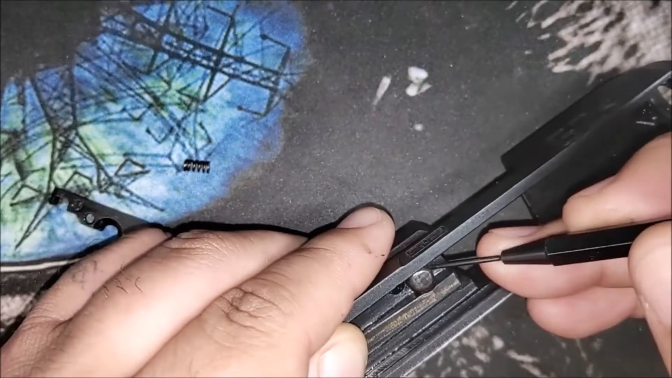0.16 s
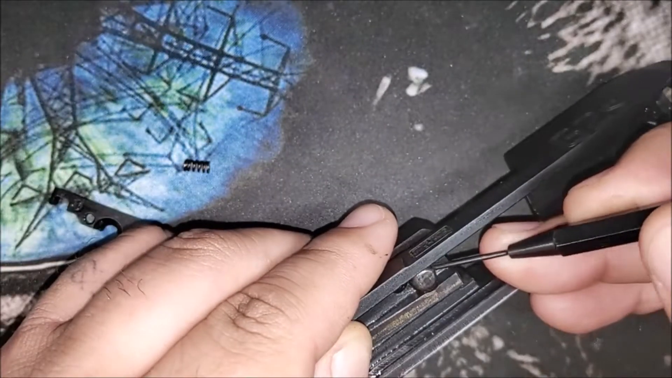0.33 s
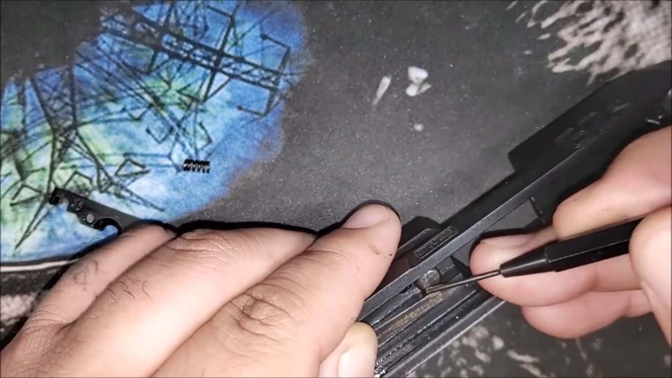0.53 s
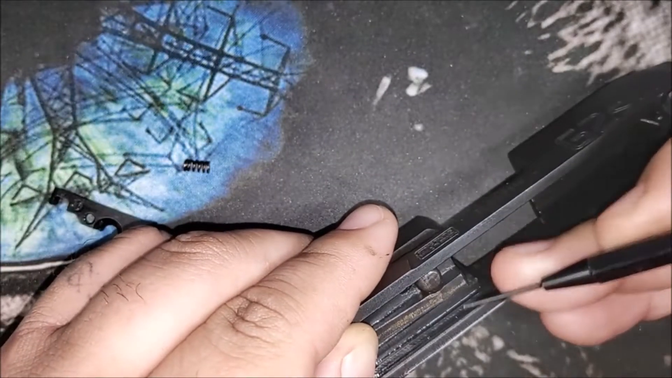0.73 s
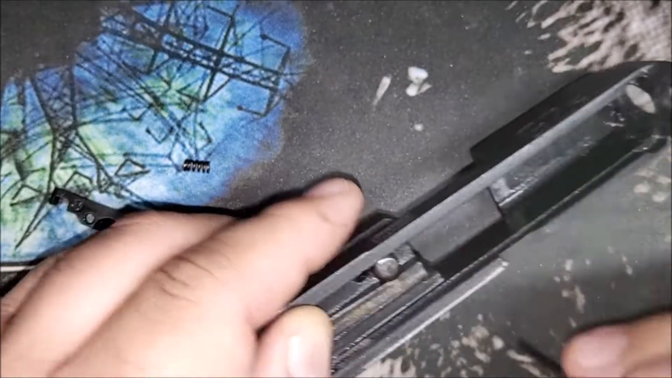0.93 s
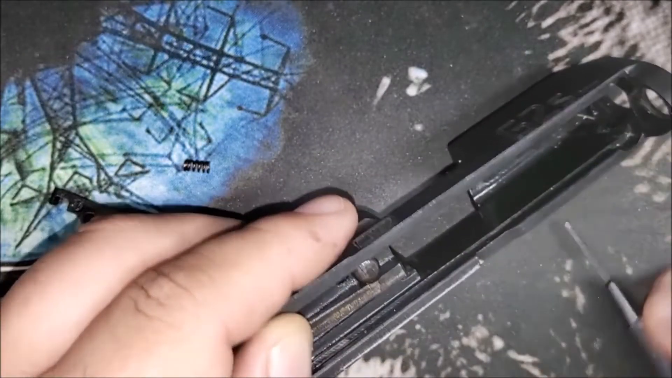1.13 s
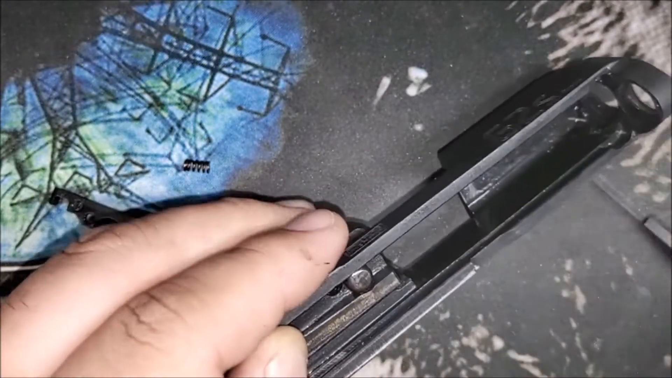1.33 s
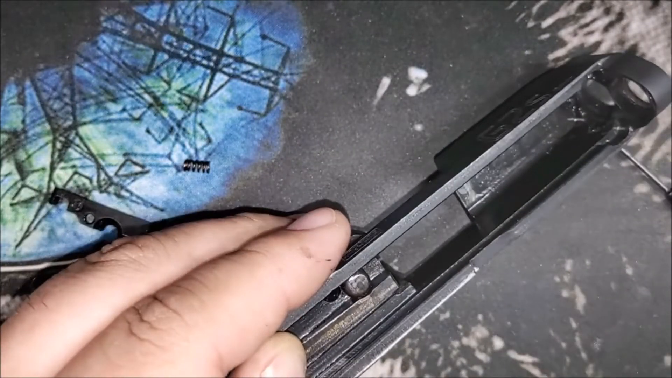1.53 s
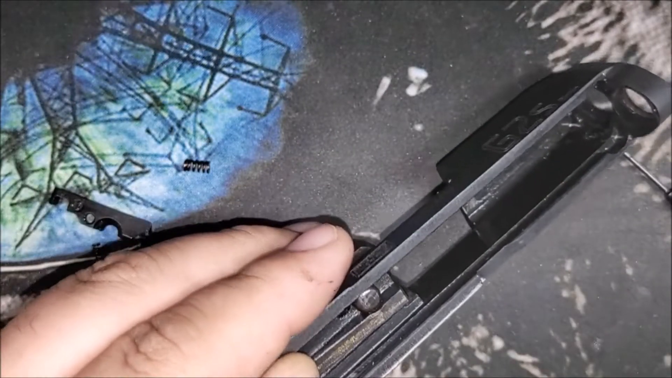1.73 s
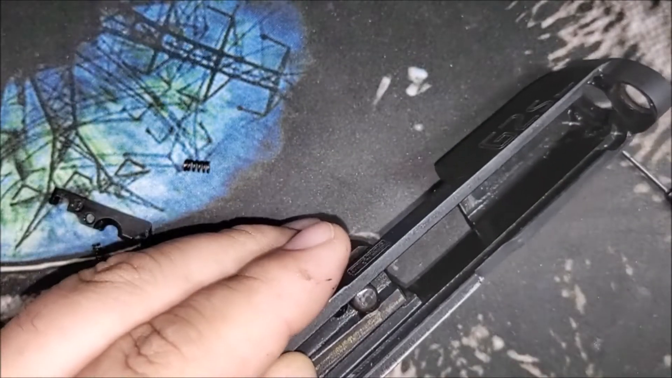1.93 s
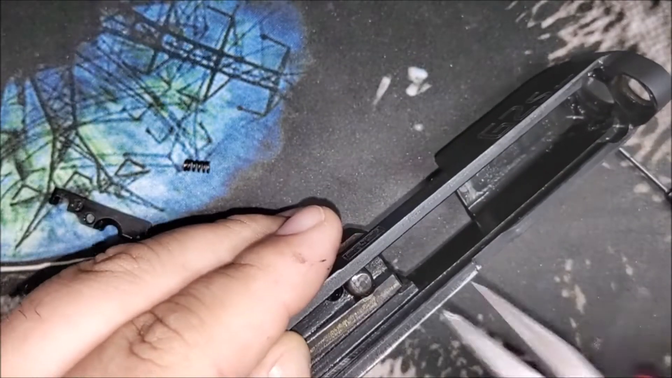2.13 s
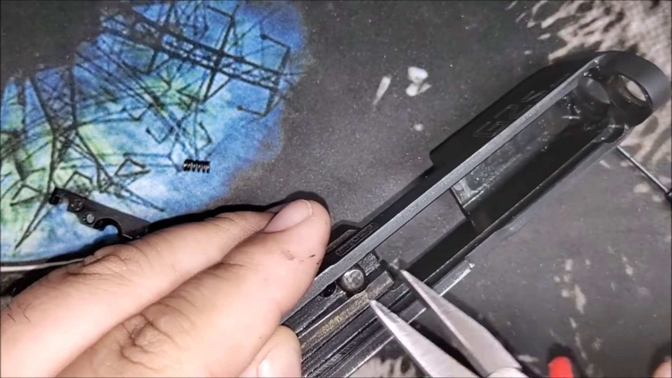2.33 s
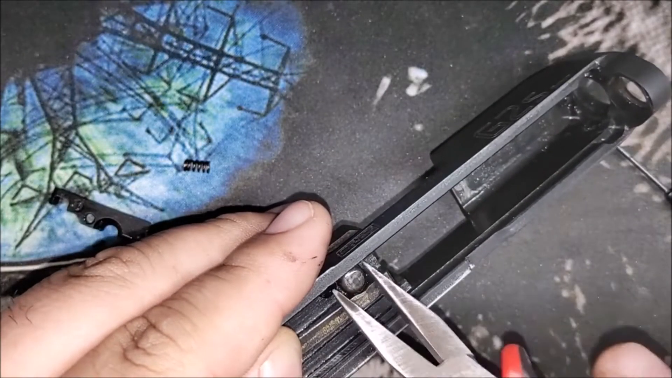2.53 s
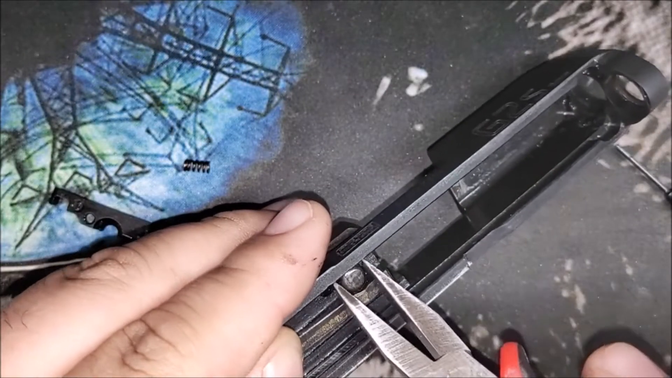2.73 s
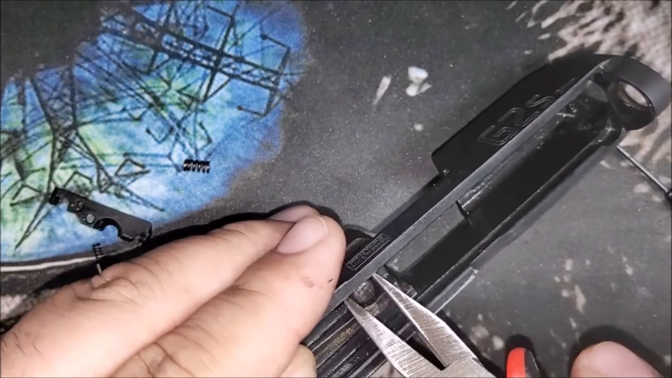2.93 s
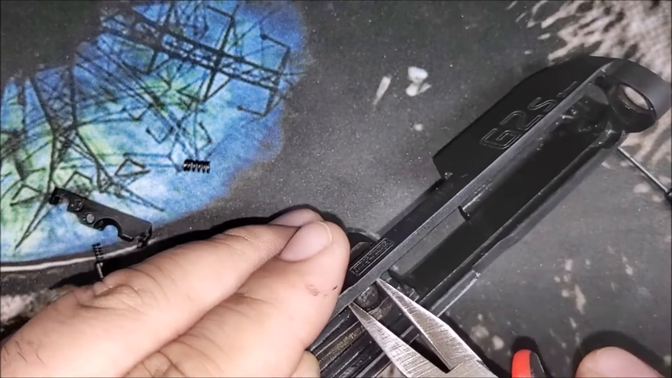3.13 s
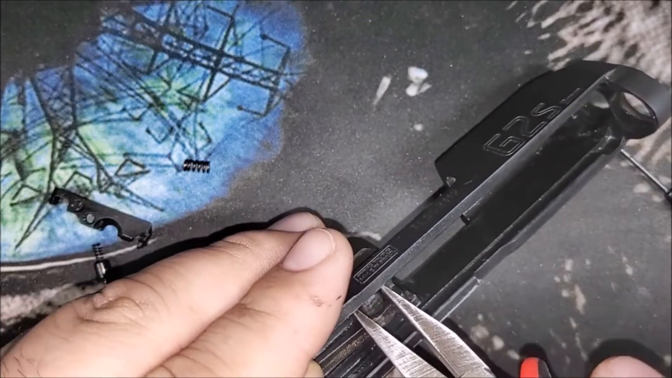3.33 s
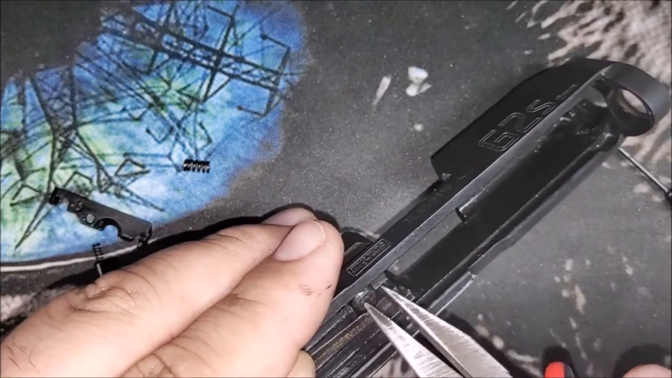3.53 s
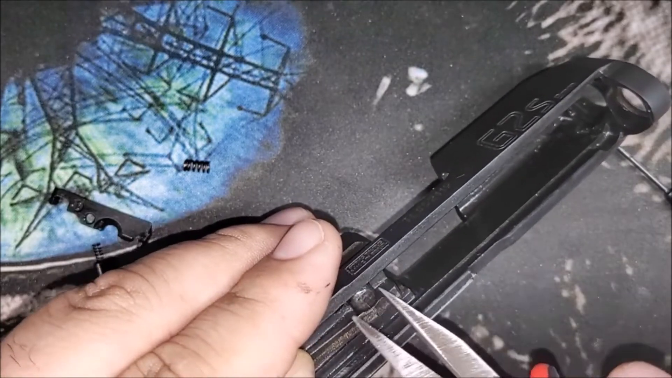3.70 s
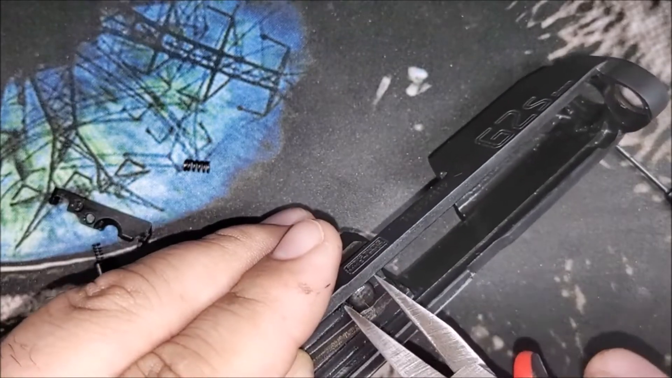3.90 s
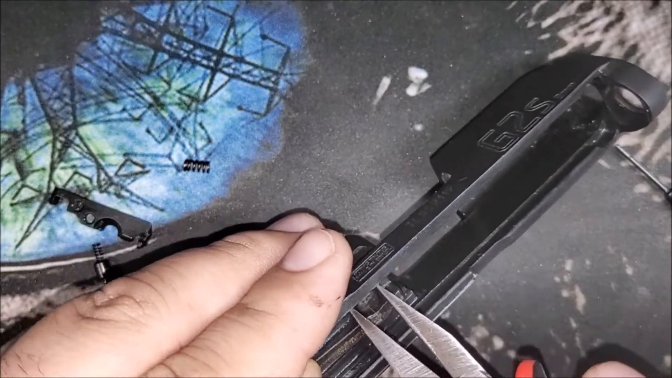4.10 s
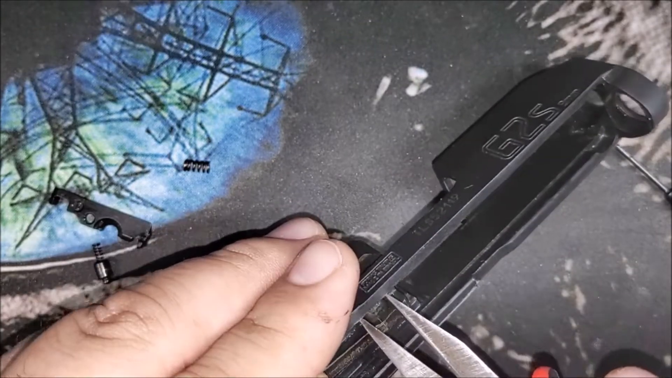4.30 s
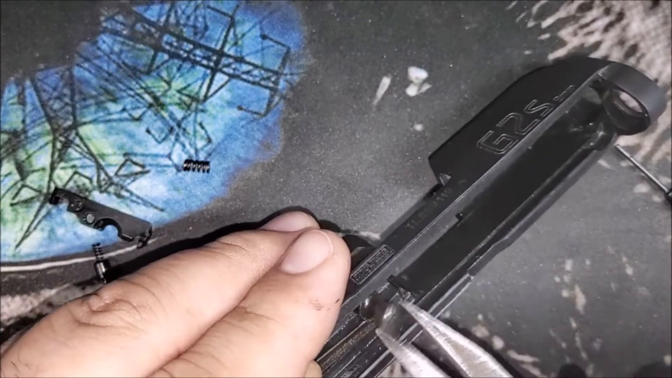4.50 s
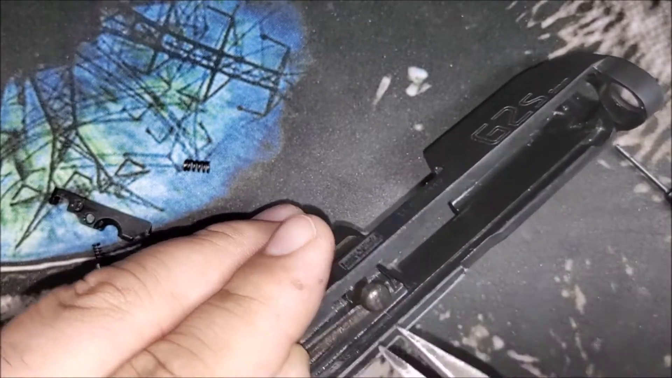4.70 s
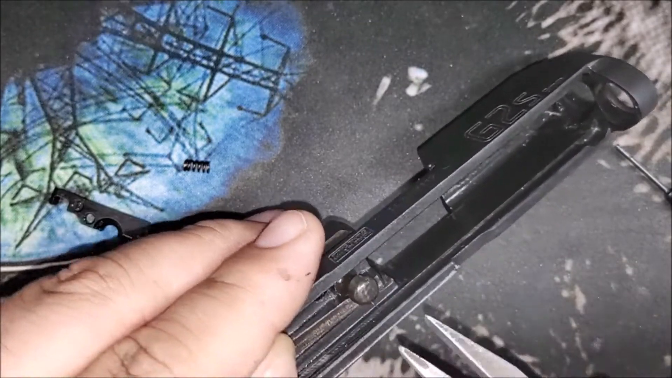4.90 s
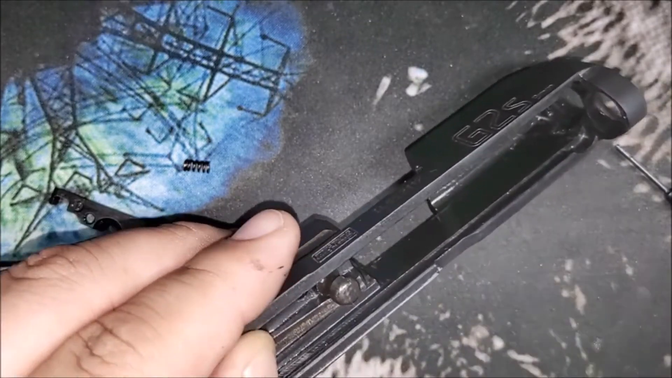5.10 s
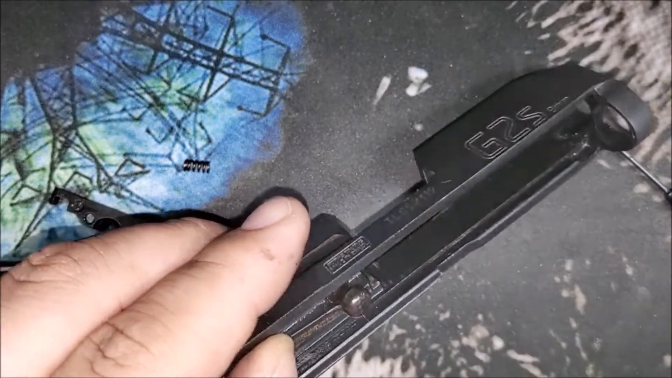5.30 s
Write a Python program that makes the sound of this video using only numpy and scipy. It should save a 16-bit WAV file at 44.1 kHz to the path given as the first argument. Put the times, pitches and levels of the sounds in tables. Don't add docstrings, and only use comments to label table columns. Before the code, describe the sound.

Close stereo phone microphones over a padded bench in a quiet, low-humming room. A pick ticks faintly on steel, a hand brushes the mat, and a dropped tool knocks sharply, bounces and rolls. Then plier jaws click and scrape on a small steel part, with short clear rings, and the pliers are laid down with a woody knock.

```python
import sys
import numpy as np
from scipy import signal
from scipy.fft import rfft, irfft, next_fast_len
from scipy.io import wavfile
from scipy.ndimage import uniform_filter1d

SR = 44100
rng = np.random.default_rng(int(sys.argv[2]) if len(sys.argv) > 2 else 0)


def field_ratio(decibels):
    return 10 ** (np.asarray(decibels, dtype=float) / 20)


def waveform_to_disk(signal):
    frames = np.transpose(np.atleast_2d(signal))
    scaled = np.clip(frames, -1, 1) * 32767
    samples = np.round(scaled).astype(np.int16)
    wavfile.write(sys.argv[1], SR, samples)


N = 240412


def unit(x):
    return x / np.sqrt(np.mean(x ** 2) + 1e-20)


def along(points, hz):
    f, v = np.transpose(points)
    return np.interp(np.log(hz + 1), np.log(f + 1), v)


def curves(rows):
    s, *cols = np.transpose(rows)
    return [np.interp(np.arange(N) / SR, s, c) for c in cols]


def wobble(rate_hz):
    return np.interp(np.arange(N) * min(rate_hz, 200) / SR, np.arange(1200), rng.standard_normal(1200))


def filtered(x, response):
    m = next_fast_len(x.shape[-1] + 4096)
    spectrum = rfft(x, m) * response(np.fft.rfftfreq(m, 1 / SR))
    return irfft(spectrum, m)[..., :x.shape[-1]]


def ringing(modes, t, spread_db, stretch=0.87):
    hz, db, t60_s = np.transpose(modes)[:3, :, None]
    chance = rng.standard_normal(hz.shape)
    level_db = db + spread_db * chance - 60 * t / (t60_s * stretch)
    return field_ratio(level_db) * np.sin(2 * np.pi * hz * t)


def add(track, s, sound):
    part = track[..., round(s * SR):][..., :sound.shape[-1]]
    part += sound[..., :part.shape[-1]]


def ports(x, balance_db):
    lag_samples = 17
    lean = field_ratio(np.reshape(balance_db, (-1, 1)) / 2)
    left = np.pad((x * lean).sum(0), (lag_samples, 0))[:x.shape[1]]
    return np.array([left, (x / lean).sum(0)])


def room_tone():
    # start_s, air_db, hum_db
    room = [(0, -71, -73.5), (.75, -70.5, -66), (1.7, -71, -65.5), (2.9, -71, -74.5), (3.15, -70, -76),
            (4.0, -71, -80), (5.45, -69, -73)]
    # pitch_hz, level_db per Hz
    air_spectrum = [(22, -46.5), (30, -26), (39, 1.5), (50, -6.5), (70, -6.5), (100, -11.5), (200, -22.5),
                    (320, -16), (480, -12), (620, -20), (800, -15), (1100, -23.5), (1500, -25),
                    (1500, -24.5), (2100, -26.5), (3000, -30), (4400, -33), (7000, -33.5), (8600, -32.5),
                  (10000, -36), (12000, -44), (13200, -47.5), (15500, -53)]
    # pitch_hz, side_minus_mid_db
    air_side = [(60, -22), (110, -13.5), (200, -8), (380, -7.5), (700, -5.5), (1290, 2.5), (2380, -0.5),
                (4400, 3), (8120, -16), (15000, -6)]
    # pitch_hz, width_hz, level_db
    machines = [(58.8, 4, 0.0), (2144, 93, -20.5), (4080, 22, -24), (5540, 32, -22.5), (8300, 110, -21.5)]

    air_db, hum_db = curves(room)
    shape = lambda f: field_ratio(along(air_spectrum, f) + [0 * f, along(air_side, f)])
    mid, side = filtered(rng.standard_normal((2, N)), shape)
    air = np.array([mid + side, mid - side]) / np.sqrt(np.mean(mid ** 2))
    air = air * field_ratio(air_db + 4.5 + 0.96 * wobble(2.96))

    def narrow(f, lines):
        return sum(field_ratio(db) / np.sqrt(width_hz) / (1 + (2 * (f - hz) / width_hz) ** 2)
                   for hz, width_hz, db in lines)

    hum = unit(filtered(rng.standard_normal(N), lambda f: narrow(f, machines[:1])))
    whine = unit(filtered(rng.standard_normal(N), lambda f: narrow(f, machines[1:])))
    tone = np.sin(2 * np.pi * machines[0][0] * np.arange(N) / SR)
    return air + field_ratio(hum_db) * (0.5 * hum + 1.1 * tone) + field_ratio(-82.0) * whine


def ticks():
    # pitch_hz, level_db, t60_s
    steel_modes = [(2967, -9, 0.06), (4200, -3.5, 0.097), (5850, -12.5, 0.042), (6700, 5, 0.045),
                   (8320, -9, 0.047), (9570, -4, 0.074), (11950, -6, .04)]
    # pitch_hz, level_db
    crack = [(500, -39), (1000, -11.5), (1800, -8), (2700, 1.5), (4000, -4), (5000, -2.5), (9000, -6),
             (12000, -9), (13200, -21), (16000, -32)]
    # start_s, peak_db, loudest_hz, treble_db
    pick = [
        (0.0034, -58.5, 9250, -7),
        (0.373, -44.5, 4200, -17),
        (0.382, -45.5, 2400, -22),
        (0.3852, -44.5, 9660, -6),
    ]
    # start_s, peak_db, loudest_hz, treble_db
    roll = [
        (1.2855, -37, 2770, -32),
        (1.4723, -59, 2080, -24),
    ]
    # start_s, peak_db, loudest_hz, treble_db
    jaws = [(2.4948, -47.5, 6700, -17), (2.51, -51, 3570, -18), (2.526, -48.5, 3600, -23),
            (2.715, -49, 4500, -20), (2.7466, -42.5, 4150, -17.5), (2.859, -53, 4150, -15),
            (2.9166, -40.5, 3820, -18.5), (3.3745, -43.5, 3020, -18), (3.3796, -42, 4530, -22),
            (3.386, -36, 4470, -24), (3.396, -27, 4420, -14.5), (3.3996, -29.5, 2970, -17.5),
            (3.4074, -42, 4590, -18), (3.7304, -46, 4970, -12.5), (3.7726, -52, 3100, -19),
            (3.79, -47, 4800, -21), (3.8003, -49, 6530, -19), (3.815, -51, 4560, -13),
            (3.9194, -60, 1790, -12), (4.0231, -49, 6700, -13.5), (4.0295, -55, 4590, -14),
            (4.2373, -58, 2040, -22), (4.3096, -39.5, 4500, -23), (4.3168, -49, 4470, -12),
            (4.3319, -48, 4590, -11), (4.478, -48.5, 9000, -14), (4.486, -34.5, 8360, -12.5),
            (4.4948, -45, 3640, -14)]
    # start_s, peak_db, loudest_hz, treble_db
    laid = [
        (5.2218, -47, 2300, -17),
        (5.3626, -33, 5150, -22),
        (5.4188, -52, 2610, -26),
        (5.4307, -55, 1830, -22),
    ]
    # left_minus_right_db, scrape_t60_s at 4 kHz
    holds = [
        (-5, 0.065),
        (-3, 0.021),
        (-2, 0.038),
        (-4, 0.043),
    ]
    t60_pitch_power, t60_share_per_soft_db = 0.26, 0.0044

    out, t = np.zeros((2, N)), np.arange(SR // 8) / SR
    contacts = [(*row, *hold) for rows, hold in zip((pick, roll, jaws, laid), holds) for row in rows]
    for s, db, hz, treble_db, balance_db, life_s in contacts:
        t60_s = life_s * (hz / 4000) ** t60_pitch_power * (1 - t60_share_per_soft_db * (db + 50))

        def tilt_db(f):
            return 0.8 * (treble_db + 15.0) * np.clip(np.log2(f / 4000 + .01), -.3, 1.5)

        def colour(f):
            peak = 1 + 3.7 / (1 + ((f - hz) / (0.033 * hz)) ** 2)
            return field_ratio(along(crack, f) + tilt_db(f)) * peak

        grit = rng.standard_normal((3, len(t)))
        grit = grit * np.exp(.3 * rng.standard_normal(len(t) // 20 + 1).repeat(20)[:len(t)])
        drag = field_ratio(-60 * t / max(t60_s, .005)) * (1 - np.exp(-t / .0015))
        spike = 0.92 * field_ratio(-60 * t / 0.0042)
        scrape = unit(filtered(grit, colour)) * (drag + spike) * (1 - np.exp(-t / 0.00034))
        tilted = [(f, level_db + tilt_db(f), life) for f, level_db, life in steel_modes]
        modes = ringing(tilted, t, spread_db=4.0) * (1 - np.exp(-t / 0.00087))
        direct = ports(np.vstack([0.5 * scrape[0], field_ratio(-8.5) * modes]), balance_db)
        add(out, s, field_ratio(db - 6.5) * (direct + 1.12 * scrape[1:]))
    return out


def rings():
    # start_s, level_db of each of the three long modes, share of the free decay time
    free_contacts = [(.103, -85, -58.5, -85, 0.24), (2.5, -83, -63, -63, 0.51),
                     (2.714, -85, -75, -64, 0.87), (2.77, -83, -85, -70, 1.6), (2.92, -85, -61, -65, .4),
                     (3.386, -75, -64, -46.5, 0.54), (3.398, -77, -63, -49.5, 0.94),
                     (3.731, -70, -78, -67, 0.91), (3.772, -63, -68, -74, 0.79),
                     (3.818, -72, -59.5, -56, 0.51), (4.029, -83, -70, -67, .6),
                     (4.312, -52, -58, -44, 0.39), (4.345, -71, -67, -69, 1.2), (4.4, -76, -62, -64.5, 0.8),
                     (4.487, -71, -56, -53.5, 0.48), (4.505, -64, -62, -62, 0.75)]
    # pitch_hz, t60_s
    block = [(2476, 0.17), (3556, 0.22), (4592, 0.27)]

    out, t = np.zeros((2, N)), np.arange(SR // 4) / SR
    for s, *levels_db, stretch in free_contacts:
        struck = [(hz, db, t60_s) for (hz, t60_s), db in zip(block, levels_db)]
        modes = ringing(struck, t, 0, max(stretch, .1))
        add(out, s, ports(modes * (1 - np.exp(-t / 0.0017)), -9.5))
    return out


def brush():
    # start_s (full level), hold_s, level_db, brightness_db per octave
    strokes = [(0.802, 0.18, -70, -0.5), (0.967, 0.21, -63.5, 1), (1.186, .11, -60, -2),
               (1.34, 0.096, -76, -3), (1.481, 0.038, -71.5, 4.5), (1.573, 0.077, -64.5, 2.5),
               (1.69, 0.036, -74, -1), (2.51, 0.019, -69, -4.5), (3.372, 0.031, -72, -3),
               (3.78, 0.039, -75.5, -5), (4.311, 0.039, -69.5, -2.2), (4.37, .07, -77.5, -5),
               (4.922, 0.038, -76.5, -3.5), (5.203, 0.011, -67, 1.5), (5.295, 0.065, -73.5, -3),
               (5.36, 0.07, -66, -2)]
    # pitch_hz, level_db per Hz
    mat = [(500, -21), (1200, -6), (2500, -4.5), (6500, -3.5), (9500, -7), (12100, -17), (12900, -28),
           (14500, -42), (16000, -42.5)]
    # middle_s, half_length_s, level_db
    flicks = [
        (1.61, .025, -80),
        (4.495, .012, -76),
    ]
    rise_db_per_s, fall_db_per_s, flick_hz = 451.5, 334, 12800

    start_s, hold_s, db, tilt = np.transpose(strokes)[:, :, None]
    since_s = np.arange(N) / SR - start_s
    rise_db = np.maximum(-rise_db_per_s * since_s, 0)
    fall_db = np.maximum(fall_db_per_s * (since_s - hold_s), 0)
    level = field_ratio(db + 6.5 - rise_db - fall_db)
    share = np.clip(.5 + tilt / 8, 0, 1)
    fibres = rng.standard_normal((2, N)) * field_ratio(1.3 * wobble(180) + 1.1 * wobble(40))
    dull, bright = (filtered(fibres, lambda f: field_ratio(along(mat, f) + k * np.log2(f / 5000 + 0.011)))
                    for k in (-4, 4))
    fast = sum(field_ratio(flick_db) * np.exp(-((np.arange(N) / SR - s) / half_s) ** 4)
               for s, half_s, flick_db in flicks)
    top_treble = lambda f: (f > flick_hz) * field_ratio(-20 * np.log2(f / flick_hz + .01))
    hiss = unit(filtered(fibres.sum(0), top_treble))
    dull_level, bright_level = ((1 - share) * level).max(0), (share * level).max(0)
    return fast * hiss + dull_level * unit(dull) + bright_level * unit(bright)


def knocks(blows, panel, place, undelayed_db):
    # pitch_hz, level_db, t60_s
    frame = [(67.5, -10.5, 0.21), (85, -13.5, 0.29), (118.7, -9, 0.16), (148.5, -5, 0.18),
             (171, -9.5, 0.11), (252.4, -9.5, 0.09), (331.6, -6.5, 0.13), (366, -14, 0.11)]
    # pitch_hz, level_db
    slap_points = [(900, -3.5), (1600, -5), (2400, -1), (3500, -9), (5500, -12), (9000, -19.5),
                   (12500, -46), (14000, -70)]
    # pitch_hz, level_db, t60_s, right
    undelayed_modes = [(474, -12, 0.067, -1.2), (1292, -19, 0.039, .9), (2403, -15.5, 0.024, 0.48),
                       (4170, -42.5, 0.22, .8)]

    out, t = np.zeros((2, N)), np.arange(SR // 3) / SR
    lean_db = np.array([mode[3] for mode in panel])
    for s, db, boom_db, slap_db, stretch in blows:
        wood = -ringing(panel, t, 0.69, max(stretch, .1)) * (1 - np.exp(-t / 0.0027))
        boom = ringing(frame, t, 4.0, max(stretch, .1)) * (1 - np.exp(-t / 0.0038))

        def slap_colour(f):
            return field_ratio(along(slap_points, f) + 0.23 * (db + 6.5) * np.log2(1 + f / 3000))

        slap = unit(filtered(rng.standard_normal((2, len(t))), slap_colour))
        slap = slap * field_ratio(-60 * t / 0.044) * (1 - np.exp(-t / 0.00076))
        undelayed = sum(field_ratio(undelayed_db + level_db - 60 * t / t60_s) * np.sin(2 * np.pi * hz * t) * [[1], [right]]
                    for hz, level_db, t60_s, right in undelayed_modes)
        undelayed = undelayed * (1 - np.exp(-t / 0.003))
        direct = ports(wood, lean_db + place(s))
        add(out, s, field_ratio(db) * (undelayed + direct + field_ratio(slap_db) * slap + field_ratio(boom_db) * ports(boom, 0)))
    return out


def walls(x):
    # pitch_hz, t60_s
    decay = [(100, 0.39), (700, 0.19), (3000, 0.11), (10000, 0.17)]

    hz, t, z = signal.stft(rng.standard_normal((2, SR // 2)), SR, nperseg=256)
    tail = signal.istft(z * field_ratio(-60 * t / along(decay, hz)[:, None]), SR, nperseg=256)[1]
    late = np.pad(x, (150, 0))[None]
    return signal.fftconvolve(late, tail / np.linalg.norm(tail[0]), axes=1)[:, :N]


def scene():
    # start_s, peak_db, boom_db, slap_db, share of the decay time
    drop = [(1.084, -57, 5, -30, 0.82), (1.1393, -10, -20.5, -16, 0.88), (1.202, -42, -1, -7, 0.54),
            (1.226, -19.5, -8.5, -22.5, 0.48), (1.2812, -38, 1, -20, 0.32), (1.2865, -41, 3, -0.5, 0.71),
            (1.311, -33, -12, -11, 0.42), (1.345, -56, 2.5, 2, 1), (1.392, -44.5, -1, -6, 0.82),
            (1.527, -50.5, 5, 0.5, 0.76), (1.54, -56, 1, -16, 0.75)]
    # start_s, peak_db, boom_db, slap_db, share of the decay time
    setdown = [
        (5.221, -54, 10, -10, 0.68),
        (5.3545, -24.5, -9, -20, 0.3),
        (5.3635, -23.5, -8.5, -22, 0.92),
        (5.371, -33, -20, -21, 0.77),
        (5.401, -46, 7, -16, 0.63),
        (5.418, -48.5, 11, 1.5, 0.68),
        (5.428, -41, 3, -19, 0.77),
    ]
    # pitch_hz, level_db, t60_s, left_minus_right_db
    bench_top = [(480, -21.5, 0.05, 3), (609, -15, 0.067, -11.5), (692, -2, 0.04, -4.5),
                 (792, 2.5, 0.026, 9.5), (854, -15, 0.082, 3), (1054, -6, 0.033, -5), (1112, -19, 0.044, 2),
                 (1300, -7.5, 0.034, 3), (1680, -25, 0.063, 6)]
    # pitch_hz, level_db, t60_s, left_minus_right_db
    bench_edge = [(328.8, -7, 0.18, -3), (488, -12.5, 0.07, -10), (622, -2, 0.054, 1.5),
                  (724, -2, 0.068, 1), (808, -3, 0.04, 7.5), (1142, -7, 0.075, 3.5), (1623, -17, 0.056, 4)]
    lands_db, rests_db, roll_s = 1.6, -5, .08

    def rolling(s):
        return rests_db + (lands_db - rests_db) * np.exp(-abs(s - drop[1][0]) / roll_s)

    steel = ticks() + rings()
    bench = knocks(drop, bench_top, rolling, undelayed_db=-0.5)
    bench = bench + knocks(setdown, bench_edge, lambda s: .3, undelayed_db=-6)
    near = steel + bench + walls(field_ratio(-17.0) * steel[1] + field_ratio(-14) * bench[1]) + brush()
    mid, side = (near[0] + near[1]) / 2, (near[0] - near[1]) / 2
    side = filtered(side, lambda f: field_ratio(along([(5000, -0.5), (6000, -6.0), (12000, -13.5)], f)))
    return np.array([mid + side, mid - side]) + room_tone()


def thrift(x):
    # pitch_hz, level_db against the middle band
    worth = [(8000, -37), (9300, -8), (10500, -9.5), (12300, -14), (13200, -21.5), (16000, -25)]

    hz, t, z = signal.stft(x, SR, nperseg=1024)
    power = uniform_filter1d(np.abs(z.sum(0)) ** 2, size=3, axis=1) + 1e-20
    bands = np.arange(len(hz)) // 10
    centres = np.minimum(bands * 10 + 5, len(hz) - 1)
    band_db = 10 * np.log10(np.abs(uniform_filter1d(power, size=10, axis=0))[centres])
    middle_db = 10 * np.log10(power[(hz > 3000) & (hz < 9000)].mean(0))
    chance = rng.standard_normal((bands[-1] + 1, len(t)))
    chance = unit(uniform_filter1d(chance, size=6, axis=1))[bands]
    loud_db = (middle_db - np.median(middle_db)) * (0.38 * (hz < 12600))[:, None]
    margin_db = band_db - middle_db + loud_db - along(worth, hz)[:, None] + 5.8 * chance
    gain_db = -34 / (1 + np.exp(np.clip(2 * margin_db, -50, 50)))
    return signal.istft(z * field_ratio(gain_db), SR, nperseg=1024)[1][:, :N]


def roll_off(x):
    return signal.sosfilt(signal.butter(12, 15610, fs=SR, output="sos"), x)


def record(dry):
    dry = filtered(dry, lambda f: f ** 4 / (f ** 4 + 36 ** 4))
    return roll_off(thrift(dry))


dry = scene()
out = record(dry)
waveform_to_disk(out)
```